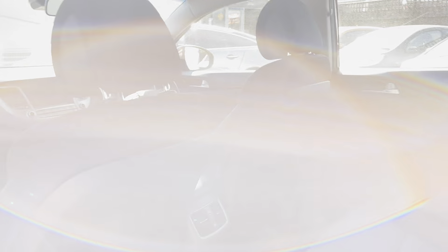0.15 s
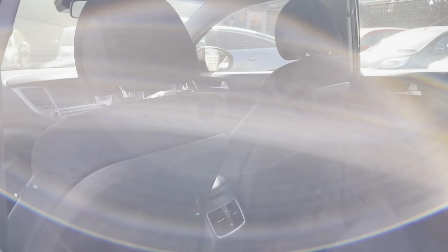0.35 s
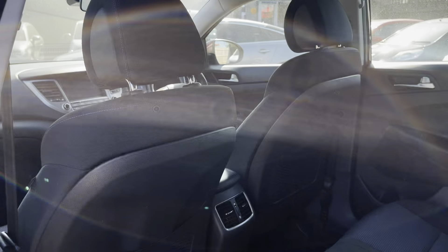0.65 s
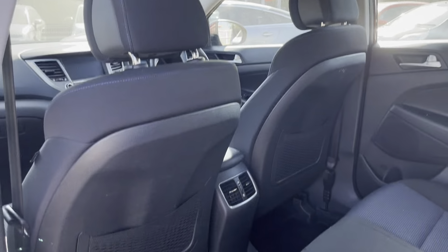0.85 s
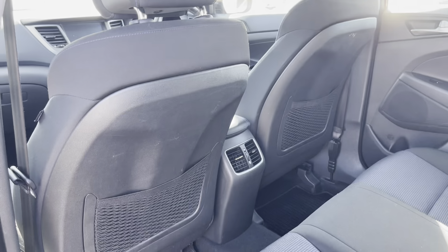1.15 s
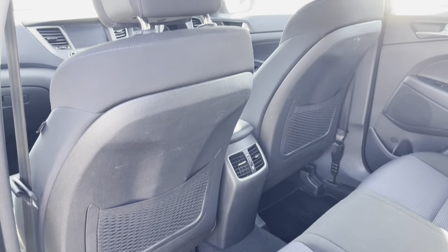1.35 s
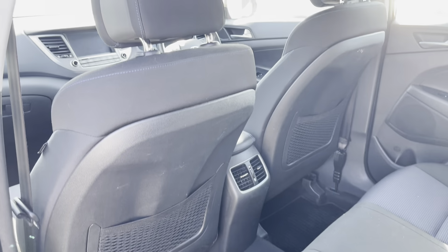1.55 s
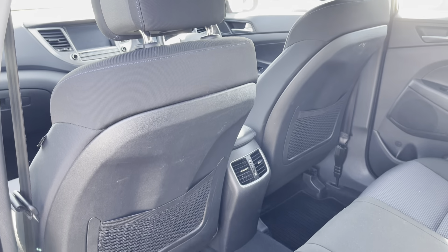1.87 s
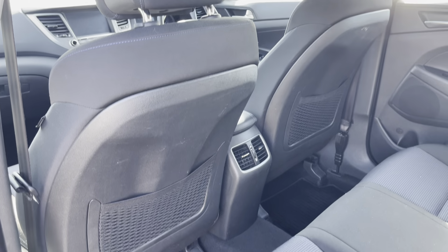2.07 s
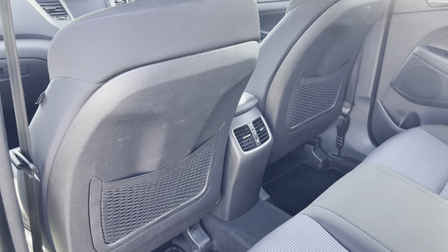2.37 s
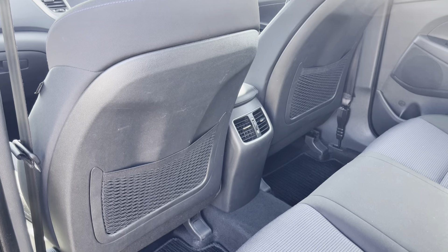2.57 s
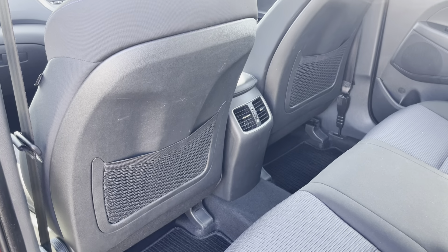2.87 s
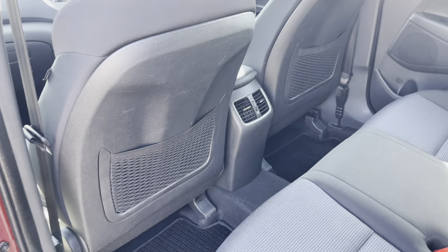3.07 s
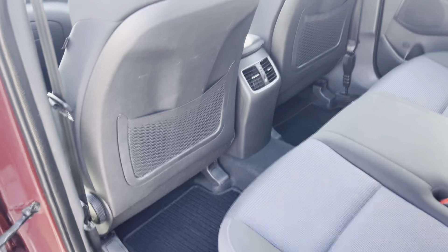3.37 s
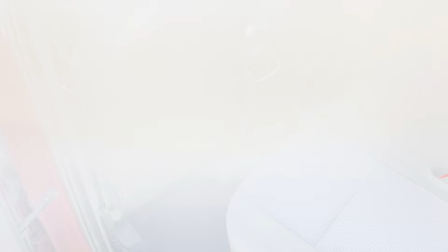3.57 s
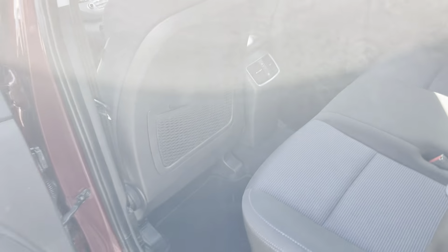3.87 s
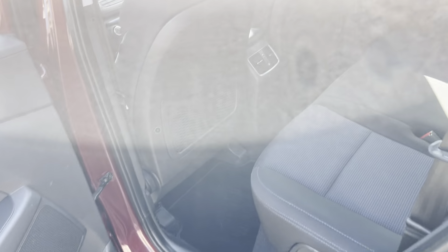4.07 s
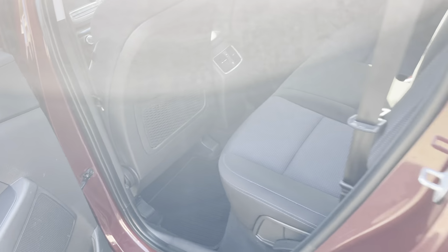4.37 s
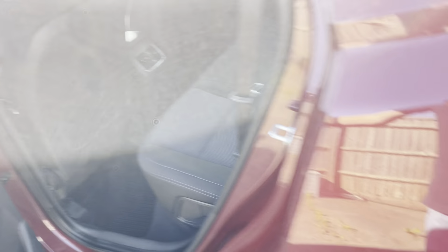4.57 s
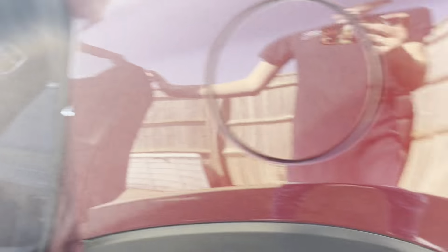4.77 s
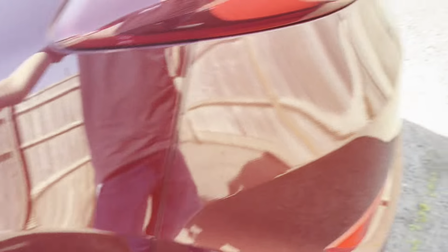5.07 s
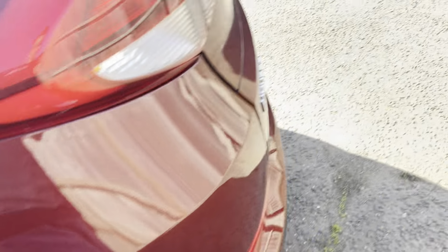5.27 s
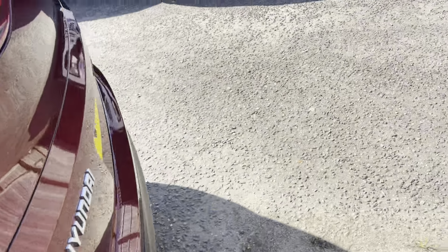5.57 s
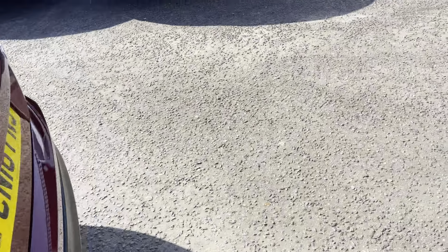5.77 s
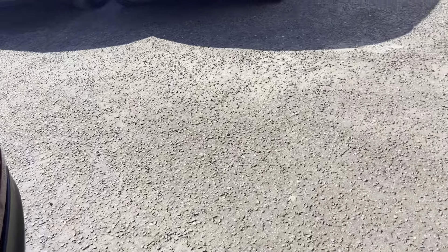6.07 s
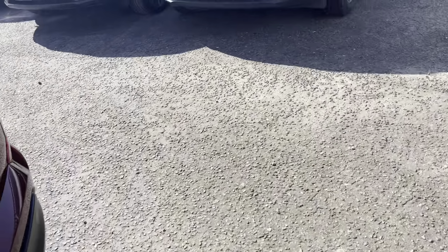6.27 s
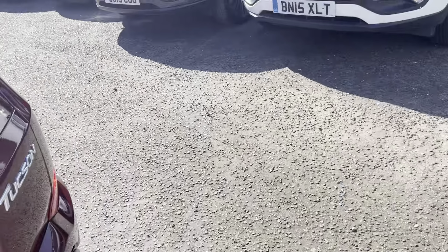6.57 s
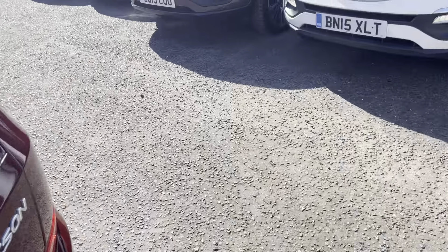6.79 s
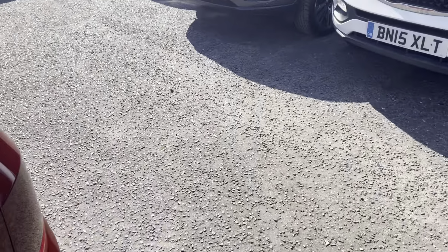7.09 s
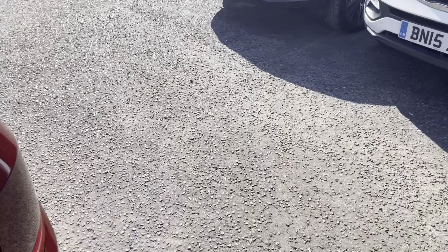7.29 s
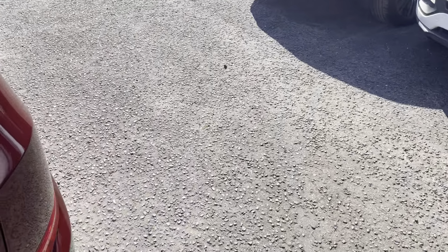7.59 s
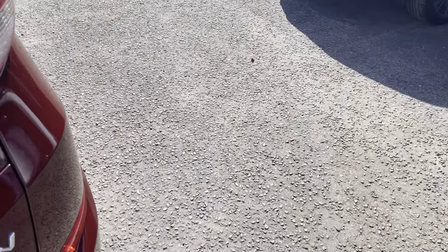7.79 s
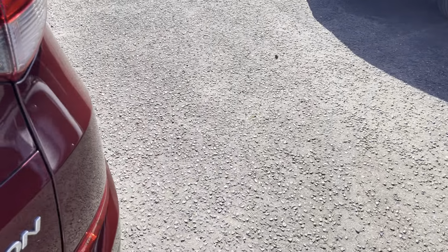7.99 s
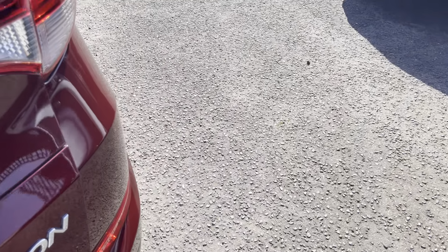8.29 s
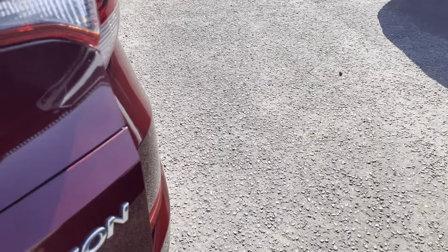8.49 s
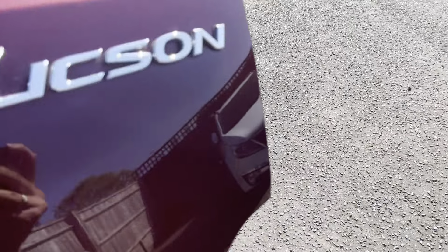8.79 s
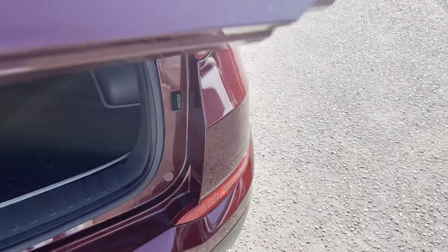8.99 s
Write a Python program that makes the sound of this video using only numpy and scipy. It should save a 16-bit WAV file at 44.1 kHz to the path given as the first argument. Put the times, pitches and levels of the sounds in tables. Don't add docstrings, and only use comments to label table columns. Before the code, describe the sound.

From 0 to 3 seconds a handheld stereo phone inside a parked car's doorway hears a deep, wavering idle from a heavy engine nearby and muffled, bassy road wash. At 3.0-3.4 small fittings click lightly, with tiny scrapes; more faint ticks and soft rubbing come at 3.7-4.5. From about 4.6 the engine swells and climbs in pitch, pulling away, while the wash opens wider and brighter. At 5.3 the door slams: a quick latch crack, hard metallic panel ring, buzzing trim and deep cabin boom, dying within half a second with a short outdoor tail. A tick follows at 5.55. Gritty shoe scuffs appear around 5.5-6.1 and clustered scrapes and taps near 7.0, with a sharp click at 7.44. At 8.1 the tailgate latch releases with a hollow low clunk; a lighter knock at 8.35, then soft scuffing and thin snaps around 8.9-9.1 over continuing traffic and low engine.

```python
import sys
import numpy as np
from scipy import signal
from scipy.fft import rfft, irfft, next_fast_len
from scipy.io import wavfile
from scipy.ndimage import uniform_filter1d

SR = 44100
rng = np.random.default_rng(int(sys.argv[2]) if len(sys.argv) > 2 else 0)


def elevation(decibels):
    levels = np.asarray(decibels, float)
    return 10 ** (levels / 20)


def store_pcm(level_fs):
    pcm = np.round(np.clip(level_fs, -1, 1) * 32767).astype(np.int16)
    wavfile.write(sys.argv[1], SR, np.atleast_2d(pcm).T)


N = 403064
TIME = np.arange(N) / SR


def band(x, hz, octaves):
    edges = np.clip(hz * 2.0 ** (np.array([-octaves, octaves]) / 2), 10, 0.45 * SR)
    return signal.sosfilt(signal.butter(2, edges, "bandpass", fs=SR, output="sos"), x)


def unit(x):
    return x / np.sqrt(np.mean(x ** 2))


def walk(rate):
    hold = int(SR / rate)
    steps = np.repeat(rng.standard_normal(N // hold + 1), hold)
    return unit(uniform_filter1d(uniform_filter1d(steps, hold), hold)[:N])


def decay(t, t60_s):
    return np.exp(-np.log(1000) * t / t60_s)


def add(out, x, s):
    i = int(s * SR)
    out[i:i + len(x)] += x[:N - i]


def on_log(hz, table):
    table_hz, value = np.transpose(table)
    return np.interp(np.log(hz), np.log(table_hz), value)


def engine():
    # start_s, cycle_hz, load_db, lean_db_per_octave
    drive = [(0.0, 13.4, -36.5, 1.5), (0.9, 13.3, -40, -3.5), (1.39, 13.3, -31, -2),
             (2.3, 13.9, -33.5, 0.5), (2.75, 14, -38.5, 1), (3.29, 13.6, -30.5, -2),
             (4.331, 13.8, -35, 1.5), (4.6, 17.8, -28, -2.5), (4.78, 20.2, -18, 3), (5.038, 21.8, -21, 0),
             (5.16, 22.4, -31.5, 4), (5.83, 23.7, -24.5, 1), (6.25, 27, -19.5, -10),
             (6.449, 27.6, -29.5, -3), (6.95, 30.5, -23.5, -4), (7.55, 31.1, -24.5, -4),
             (7.82, 27.5, -32.5, 5), (8.65, 29.2, -30, 7)]
    # pitch_hz, level_db
    exhaust = [(27, -25), (40, -11), (56, -0.5), (72, -7), (85, 2), (97, -11), (162, -12.5), (205, -25.5)]
    # order, idle_db, gain_db_per_hz above idle, waver_db
    firing_orders = [(2, 0.9, 0.0358, 1.5), (3, -19.5, 0.85, 4), (4, 0.4, -0.022, 1.5), (6, -4.5, -0.8, 2),
                     (8, 0.15, 0.0066, 1.9)]
    idle_hz = 13.6
    s, *columns = np.transpose(drive)
    hz, load_db, lean_db = (np.interp(TIME, s, c) for c in columns)
    turn = 2 * np.pi * np.cumsum(hz * (1 + 0.0067 * walk(9))) / SR
    out = np.zeros(N)
    for order, idle_db, gain_db, waver_db in firing_orders:
        level_db = load_db + idle_db + gain_db * (hz - idle_hz)
        level_db += lean_db * np.log2(order * hz / 55) + on_log(order * hz, exhaust)
        level_db += waver_db * walk(12)
        phase = order * turn + 0.25 * waver_db * walk(8)
        out += np.sqrt(2) * elevation(level_db) * np.sin(phase)
    return out


def road():
    # start_s, open_air_share (0-1), swell_db
    traffic = [(0.0, 0.16, 1.5), (1.2, 0.03, -1.5), (2.1, 0.13, -0.5), (3.0, 0.15, 0.4), (3.25, 0.22, 0.5),
               (3.79, 0.4, -0.5), (4.05, 0.38, -1.5), (4.5, 0.38, -1.8), (4.9, 0.58, .5), (5.17, 0.68, 0.5),
               (5.7, 0.66, 1.3), (6.01, 0.75, 2.7), (6.45, 0.69, 5), (6.95, 0.88, 3), (7.5, 1.02, -0.3),
               (8.25, 0.77, 1), (8.7, 0.92, 0.5), (9.14, 0.76, 2.2)]
    # pitch_hz, level_db per Hz
    cabin_colour = [(15, -34), (25, 1), (59, -0.5), (88, 8), (156, -15.5), (340, -25), (504, -32),
                    (654, -27), (1070, -24), (2970, -59), (4510, -59), (9140, -82), (10100, -96),
                    (11600, -65), (12800, -90), (16700, -120), (22000, -120)]
    # pitch_hz, level_db per Hz
    open_colour = [(71, -30), (120, 1.5), (203, -9), (289, 5), (395, -17.5), (510, -15), (697, -22),
                   (899, -21.5), (1070, -28.5), (2480, -36.5), (6860, -49), (8510, -52), (11200, -58),
                   (12800, -80), (16700, -105), (22000, -120)]
    # pitch_hz, side_minus_mid_db
    width = [(60, -32), (110, -10), (200, -5.5), (350, -4), (640, 3.5), (1160, 3.5), (2100, -1),
             (3790, -2.5), (6850, 0), (12400, 10.5)]
    # start_s, end_s
    out_of_cabin = (4.56, 6.2)
    anchors = [70, 240, 1200, 7000]
    cabin_db, open_db = (-45.5, -44.5, -59, -86.5), (-32, -33.5, -51, -58)
    swell_share = (0.18, 0.88, 0.11, 0.1)
    open_bass_hz, open_bass_fall_db = 60, 7
    s, *columns = np.transpose(traffic)
    open_air, traffic_db = (np.interp(TIME, s, c) for c in columns)
    outside = np.interp(TIME, out_of_cabin, [0, 1])

    def colour_db(hz):
        indoors = (1 - outside) * on_log(hz, cabin_colour)
        return indoors + outside * on_log(max(hz, 130), open_colour) + 10 * np.log10(hz)

    gains = [in_db + open_air * (out_db - in_db) + part * traffic_db - colour_db(hz)
             for in_db, out_db, part, hz in zip(cabin_db, open_db, swell_share, anchors)]
    out, swell = np.zeros((2, N)), walk(1.156)
    for hz in 30 * 2 ** np.arange(0, 8.9, 0.5):
        at = np.interp(np.log(hz), np.log(anchors), np.arange(4))
        low = min(int(at), 2)
        db = colour_db(hz) + gains[low] + (at - low) * (gains[low + 1] - gains[low]) - 6
        db -= outside * open_bass_fall_db * max(np.log2(open_bass_hz / hz), 0)
        db += 0.25 * swell + (1.38 + hz / 9000) * walk(9)
        mid, side = elevation(db) * unit(band(rng.standard_normal((2, N)), hz, 0.49))
        out += mid + elevation(on_log(hz, width)) * side * np.array([[1], [-1]])
    return out


def whines():
    # pitch_hz, width_octaves, level_db, fade_t60_s, flicker_db
    far = [(4550, 0.09, -80.5, 60, 2.2), (6000, .004, -73, 1.5, 3.2), (2300, 0.32, -71, 130, .6)]
    out = np.zeros((2, N))
    for hz, octaves, db, t60, flicker_db in far:
        level_db = db - 60 * TIME / t60 + flicker_db * walk(25)
        out += elevation(level_db) * unit(band(rng.standard_normal((2, N)), hz, octaves))
    return out


def rub(rows, rise_shares, grain_db):
    out, noise = np.zeros(N), rng.standard_normal(N + SR)
    size = np.repeat(rng.exponential(size=N // 60 + SR), 60).clip(0, 3)
    for (s, length, body_db, body_hz, hiss_db), rise in zip(rows, rise_shares):
        i, n = int(s * SR), int(2 * length * SR)
        u = np.arange(n) / (length * SR)
        swell = np.clip(u / rise, 0, 1) ** 1.36 * np.exp(-(u / 0.85) ** 10.0)
        grains = noise[i:i + n] * elevation(grain_db * size[i:i + n])
        body = band(band(grains, body_hz, 2.2), body_hz / 2, 3.34)
        hiss = band(grains, 7400, 2.33)
        add(out, swell * (elevation(body_db) * unit(body) + elevation(hiss_db) * unit(hiss)), s)
    return out


def scuffs():
    # start_s, length_s, body_db, body_hz, hiss_db
    strokes = [(2.998, .04, -66, 1500, -73), (3.165, 0.043, -47, 990, -67), (3.125, 0.098, -72, 2980, -70),
               (3.714, 0.11, -68, 2200, -61), (4.263, 0.3, -65.5, 2950, -92), (4.73, 0.28, -80, 3000, -63),
               (5.434, 0.36, -57.5, 2496, -54), (6.094, 0.071, -51, 3547, -53),
               (6.679, 0.041, -49, 1998, -53), (6.99, 0.08, -34, 1200, -50.5),
               (7.014, 0.044, -37.5, 1200, -52.5), (7.252, 0.03, -44.5, 792, -64),
               (7.436, 0.028, -35.5, 1970, -58), (7.824, 0.024, -34, 1400, -39.5),
               (7.85, .014, -34, 1700, -42), (8.078, 0.045, -36, 1500, -45), (8.094, .02, -25, 784, -47.5),
               (8.133, 0.05, -37, 2190, -39), (8.156, .024, -40, 3000, -44), (8.125, .06, -34, 520, -60),
               (8.105, .035, -41, 2500, -50), (8.34, 0.03, -42, 1004, -48.5), (8.67, 0.046, -52, 1999, -55),
               (8.87, 0.16, -51.5, 1500, -51.5), (9.106, 0.036, -56, 3000, -49.5)]
    return rub(strokes, [0.22] * len(strokes), grain_db=3.85)


def ticks():
    # start_s, peak_db, tick_hz, knock_minus_tick_db, knock_hz
    contacts = [(3.024, -43.5, 1900, -1, 490), (3.0994, -34.5, 1600, -1, 522), (3.1267, -40, 1540, 2, 549),
                (3.1687, -51, 1690, 8, 420), (3.3942, -38, 2840, 10.5, 580), (3.7, -42.5, 2110, -3, 521),
                (3.766, -46, 4800, -12, 500), (4.33, -51, 3000, -12, 500), (4.527, -50, 2700, -11.5, 424.6),
                (5.1936, -42, 1690, -2, 526), (7.262, -43, 900, 3, 600), (7.829, -30.5, 1500, -7, 600),
                (5.2947, -12.5, 2050, -12, 516), (5.553, -33, 3740, -29, 435.5),
                (5.63, -45, 2600, -3, 485.3), (6.6936, -45, 2300, 9, 490), (6.8172, -39, 1730, -5, 533),
                (7.444, -22.5, 5000, -8, 815), (7.4854, -49, 2100, -6.5, 428),
                (7.9813, -37, 1956, -20, 448.5), (8.094, -27, 1718, -3, 460.5),
                (8.3482, -33, 3120, -3, 438), (8.9067, -31.5, 1624, -1, 390), (8.994, -36, 1910, -1, 413)]
    tick_t60_s, hard_extra_s = 0.008, 0.05
    out, t = np.zeros(N), TIME[:SR // 10]
    for s, db, tick_hz, knock_db, knock_hz in contacts:
        fade = decay(t, tick_t60_s + hard_extra_s * elevation(db))
        crack = rng.standard_normal(len(t)) * (1 - np.exp(-t / 0.0006)) * fade
        tick = band(crack, tick_hz, 0.82) + 0.29 * band(crack, 4500, 3.4)
        knock = np.sin(2 * np.pi * knock_hz * t) * (t / 0.004) ** 2 * np.exp(-t / 0.0017)
        both = tick / abs(tick).max() + elevation(knock_db + 4.5) * knock / abs(knock).max()
        add(out, elevation(db) * both, s)
    return out


def snaps():
    # start_s, peak_db, pitch_hz
    events = [(3.1008, -46, 4300), (3.1282, -42, 7600), (3.395, -38, 7000), (3.7652, -35, 10830),
              (4.4672, -56, 6020), (5.142, -31.5, 10970), (5.294, -18, 8300), (5.3666, -32, 8700),
              (5.497, -50, 6400), (5.5067, -41, 8220), (7.1142, -32, 11600), (7.442, -29, 6200),
              (7.4435, -33, 10800), (7.755, -43, 9250), (8.0517, -42.5, 7700), (8.924, -38, 11000),
              (8.9546, -36, 10900), (8.9595, -23, 11900), (9.0362, -28, 11070)]
    out, t = np.zeros(N), TIME[:SR // 10]
    for s, db, hz in events:
        snap = band(rng.standard_normal(len(t)) * decay(t, 0.0064), hz, 0.56)
        add(out, elevation(db) * snap / abs(snap).max(), s)
    return out


def ring_up(modes):
    out, t = np.zeros(N), TIME[:SR // 2]
    for s, hz, db, rise_s, t60 in modes:
        swell = (1 - np.exp(-t / rise_s)) * decay(t, t60)
        add(out, elevation(db) * swell * np.sin(2 * np.pi * hz * t), s)
    return out


def small_parts():
    # start_s, pitch_hz, level_db, rise_s, t60_s
    short_rings = [(4.47, 2200, -44, .001, 0.011), (6.2, 3600, -48, .001, 0.018), (3.394, 340, -28, .002, .03),
                   (5.298, 225, -1, 0.0011, 0.04), (5.375, 400, -24, .004, .15),
                   (3.394, 1600, -36, .0005, .01), (3.701, 2400, -42, .001, .015),
                   (8.096, 1600, -22, .001, .02), (7.832, 1900, -28, .001, .02), (5.309, 760, -15, .002, .05),
                   (5.279, 2960, -22, 0.0019, 0.026), (5.553, 3700, -27, .001, .012),
                   (5.2955, 2200, -14, .0008, .02), (3.394, 4560, -41, .0004, .008),
                   (3.024, 1900, -38, .0006, 0.013), (3.1, 1800, -29, .0006, .01),
                   (5.553, 2410, -28, .001, .014), (7.032, 873, -19.5, 0.002, 0.05),
                   (7.045, 1130, -17, .002, 0.022), (8.098, 228, -16.5, .002, 0.12),
                   (7.444, 2100, -16.5, 0.00084, 0.016), (7.444, 3270, -20.5, 0.00058, 0.016),
                   (8.348, 3200, -29.5, 0.0011, 0.018), (8.349, 390, -21.5, .002, 0.12),
                   (5.303, 538, -14, .003, .13), (5.305, 727, -17, .003, .15), (5.304, 436, -19, .003, .2),
             (5.306, 829, -18, .002, .12), (5.2795, 2250, -14, .002, .04), (5.281, 1600, -19, .002, .04),
             (5.322, 2700, -26, .002, .06), (5.4605, 900, -30, .001, .04), (3.1275, 6200, -33, .0006, .008),
             (3.128, 1850, -34, .0006, .008), (3.394, 12000, -40, .0004, .006),
             (3.187, 800, -38, .001, .015), (6.994, 1500, -26, .001, .015), (7.02, 880, -25, .003, .05),
             (7.029, 2300, -24, .002, .03), (7.03, 1250, -20, .002, .03), (7.05, 850, -22, .002, .03),
             (7.262, 800, -26, .001, .02), (7.6287, 8500, -40, .0005, .008), (7.55, 6500, -46, .0005, .008),
             (7.9814, 6300, -44, .0005, .008), (7.46, 2050, -33, .001, .015), (8.101, 455, -14, .001, .03),
             (8.1, 1100, -20, .001, .02), (8.161, 3000, -33, .001, .02), (8.994, 1900, -25, .001, .012),
             (8.924, 9000, -38, .0005, .006), (8.953, 11200, -32, .0005, .008),
             (8.941, 11500, -38, .001, .02), (9.134, 11000, -36, .001, .01), (9.133, 8800, -38, .001, .01),
             (3.1005, 11300, -38, .0004, .006), (3.128, 11500, -34, .0004, .006),
             (3.128, 8500, -38, .0004, .006), (3.169, 5500, -48, .002, .015), (7.829, 900, -27, .001, .02),
             (7.856, 2500, -30, .001, .012), (3.6, 11200, -52, .002, .02)]
    return ring_up(short_rings)


def slam_rattles():
    # start_s, length_s, body_db, body_hz, hiss_db
    shakes = [(5.295, .026, -30, 2600, -55), (5.2755, 0.026, -20.5, 2100, -46),
              (5.287, 0.066, -14, 687, -40), (5.315, 0.019, -25, 1500, -55), (5.332, 0.11, -34, 616, -60.5),
              (5.311, 0.17, -28, 215, -60), (5.318, .026, -27, 2000, -52), (5.342, .04, -40, 1500, -66),
              (5.382, .014, -34, 2500, -39), (5.397, .01, -37, 1500, -48), (5.458, 0.022, -41.5, 1180, -45),
              (5.548, 0.038, -51, 2970, -55.5)]
    rise_s = 0.0045
    return rub(shakes, [rise_s / row[1] for row in shakes], grain_db=1.5)


def panel(modes, blows):
    out, t = np.zeros(N), TIME[:SR // 3]
    spots = rng.standard_normal((len(blows), len(modes), 2))
    for (s, db, contact_ms), spot in zip(blows, spots):
        ring = np.zeros(len(t))
        for (hz, mode_db, t60), (place, detune) in zip(modes, spot):
            tone = np.sin(2 * np.pi * hz * (1 + 0.038 * detune) * t)
            ring += elevation(mode_db) * np.tanh(3.3 * place) * decay(t, t60) * tone
        push = np.hanning(int(contact_ms * SR / 1000) + 3)
        add(out, elevation(db) * np.convolve(ring, push / push.sum()), s)
    return out


def door():
    # pitch_hz, level_db, t60_s
    modes = [(142.3, -11, 0.25), (207.3, -12, 0.26), (267, -12, 0.073), (331.6, -21, 0.19),
             (426, -18.5, 0.11), (515.5, -14.5, 0.14), (590, -16.5, 0.051), (698, -17, 0.12),
             (750, -14.5, 0.09), (842, -21.5, 0.18), (925, -8, 0.11), (1168, -14, 0.1), (1500, -8, 0.031),
             (1700, -16.5, 0.095), (2410, -23.5, 0.062), (2800, -18, 0.073)]
    # start_s, strength_db, contact_ms
    blows = [
        (5.278, -9, 0.15),
        (5.2951, -7.5, .4),
        (5.306, -7, 0.58),
        (5.311, -10, 0.46),
        (5.322, -10, 1.2),
        (5.329, -13.5, 0.48),
        (5.341, -8, 2),
        (5.359, -19, 1.5),
        (5.386, -23, 0.14),
        (5.46, -22, 0.94),
    ]
    return panel(modes, blows)


def cabin_boom():
    # start_s, pitch_hz, level_db, rise_s, t60_s
    modes = [
        (5.292, 58.5, -3, 0.01, 0.4),
        (5.301, 99, -0.5, 0.0066, 0.18),
        (8.1, 150, -17, .003, .15),
        (8.096, 106, -9, 0.0024, 0.15),
    ]
    return ring_up(modes)


def tailgate():
    # pitch_hz, level_db, t60_s
    modes = [(146, -1.5, 0.059), (234, -4, 0.12), (297, -9, 0.072), (420, -7.5, 0.053), (506, -7.5, 0.072),
             (807, 1.5, 0.02), (980, 2, 0.013), (1350, -13, 0.036)]
    # start_s, strength_db, contact_ms
    blows = [
        (8.096, -17.5, 0.52),
        (8.101, -12.5, 0.22),
        (8.12, -16.5, 1.44),
        (8.159, -17.5, 1.15),
        (8.35, -20.5, 0.93),
        (8.912, -24, 0.96),
    ]
    return panel(modes, blows)


def ports(x):
    # start_s, right_late_body_ms, right_late_crack_ms, body_left_minus_right_db
    bearing = [
        (0, -0.32, 0.014, 5.5),
        (3.6, 0.029, 0.033, -4.5),
        (5.25, 0.39, 0.049, 5),
        (5.43, 0.084, 0.036, 0),
        (6.5, -0.34, 0.0398, -2),
        (6.9, 0.07, 0.028, -4),
        (7.35, -0.26, 0.59, 15),
        (7.7, -0.14, 0.034, 0),
        (8.0, 0.28, 0.04, 4),
        (8.6, 0.51, 0.38, 2),
    ]
    s, body_ms, crack_ms, pan_db = np.transpose(bearing)
    row = np.searchsorted(s, TIME, "right") - 1
    body = signal.sosfiltfilt(signal.butter(2, 1600, fs=SR, output="sos"), x)
    crack = x - body
    late_body = np.interp(TIME - body_ms[row] / 1000, TIME, body)
    late_crack = np.interp(TIME - crack_ms[row] / 1000, TIME, crack)
    left = body * elevation(pan_db[row] / 2) + crack
    right = late_body * elevation(-pan_db[row] / 2) + late_crack
    return np.array([left, right])


def yard(x):
    t60_s, level_db = 0.2, -14
    t = TIME[:SR // 2]
    tail = rng.standard_normal((2, len(t))) * decay(t, t60_s) * (t > 0.004)
    tail = band(tail, 900, 6.1)
    tail /= np.sqrt((tail ** 2).sum(1, keepdims=True))
    return elevation(level_db) * signal.fftconvolve(x[None], tail, axes=1)[:, :N]


def scene():
    close = scuffs() + ticks() + snaps() + small_parts() + slam_rattles() + door() + tailgate()
    deep = (engine() + cabin_boom()) * elevation([[0.25], [-0.25]])
    return ports(close) + yard(close) + deep + road() + whines()


def top_cut(x):
    return signal.sosfilt(signal.butter(12, 12980, fs=SR, output="sos"), x)


def record(dry):
    treble_hz, treble_lag_s = 8120, 0.000245
    x = signal.sosfilt(signal.butter(3, 36, "highpass", fs=SR, output="sos"), dry)
    low = signal.sosfiltfilt(signal.butter(3, treble_hz, fs=SR, output="sos"), x)
    size = next_fast_len(N)
    treble = rfft(x[0] - low[0], size)
    hz = np.arange(len(treble)) * SR / size
    late = treble * np.exp(-2j * np.pi * hz * treble_lag_s)
    x = low + irfft(np.array([late, treble]), size)[:, :N]
    x = signal.sosfilt(signal.cheby2(6, 30, 13000, fs=SR, output="sos"), x)
    x = x * np.clip((TIME[-1] - TIME) / 0.004, 0, 1)
    return top_cut(np.tanh(1.127 * x) / 1.056)


dry = scene()
out = record(dry)
store_pcm(out)
```